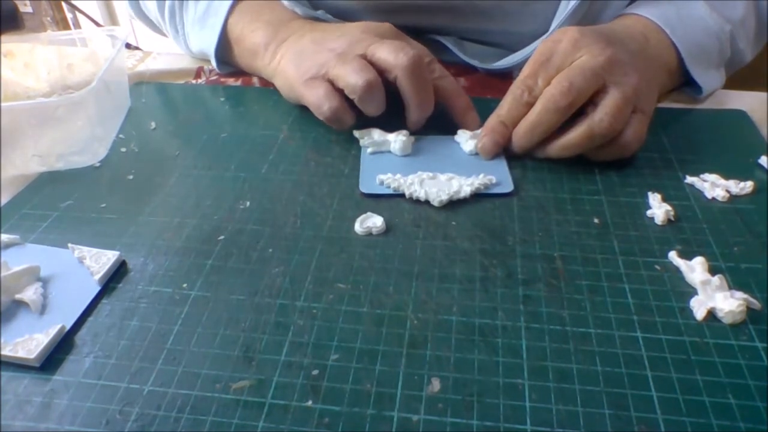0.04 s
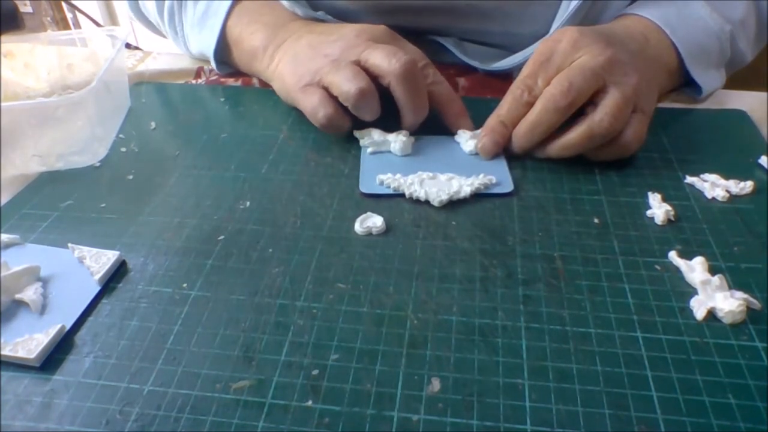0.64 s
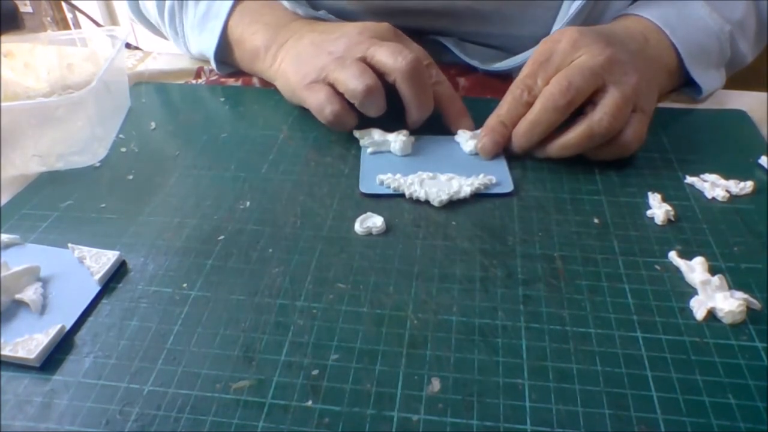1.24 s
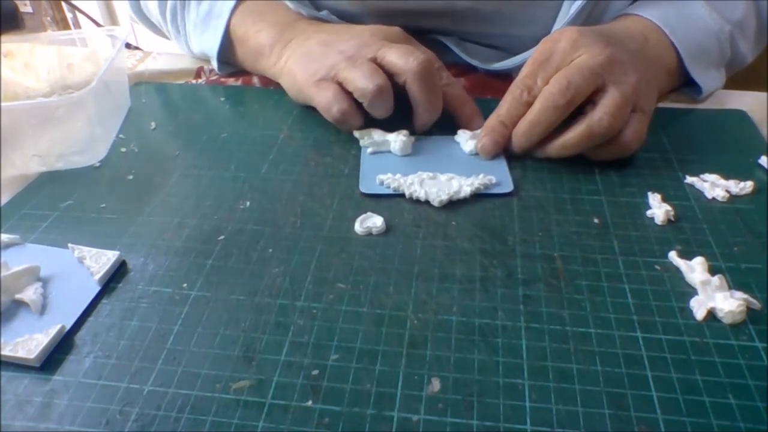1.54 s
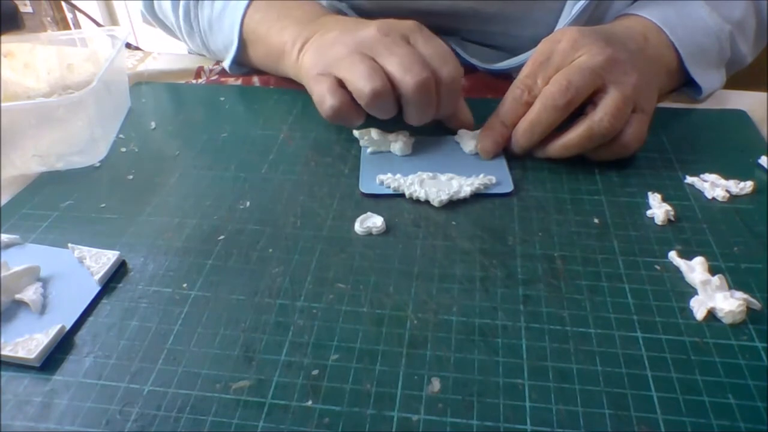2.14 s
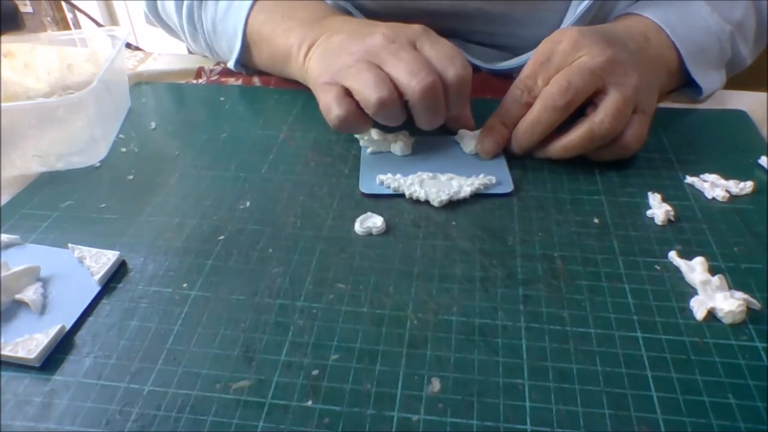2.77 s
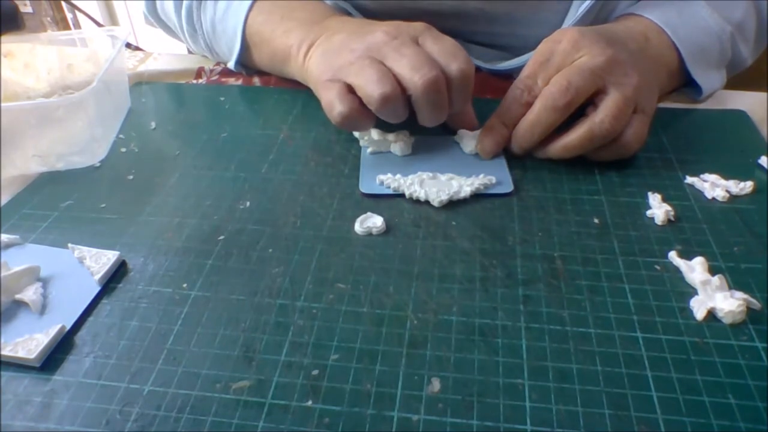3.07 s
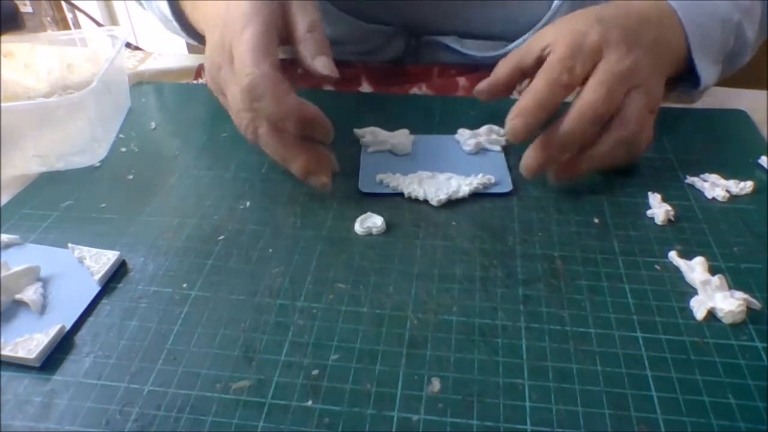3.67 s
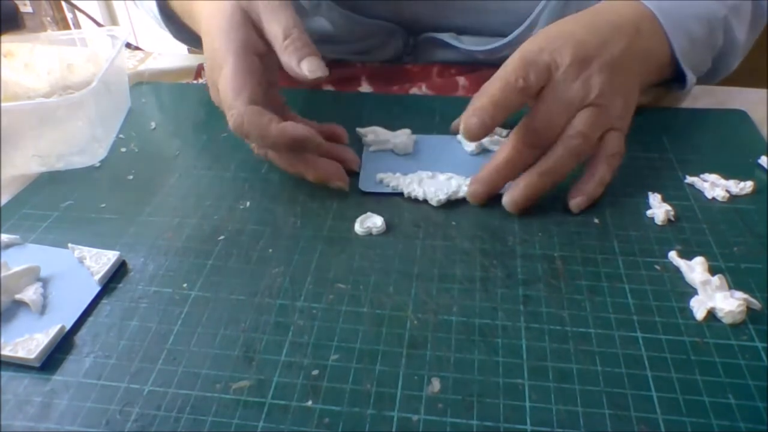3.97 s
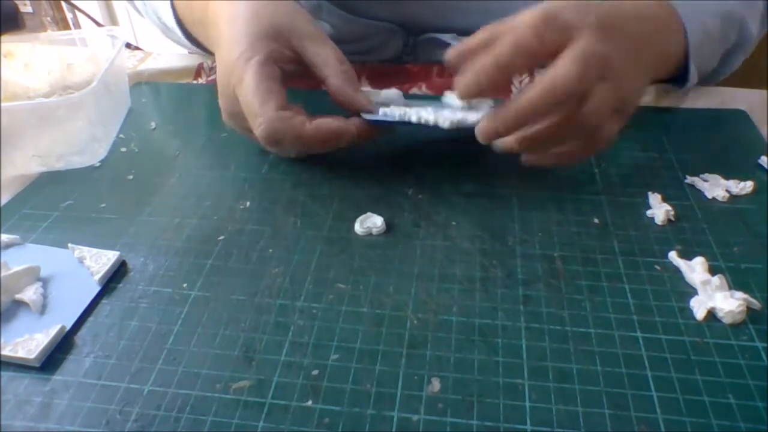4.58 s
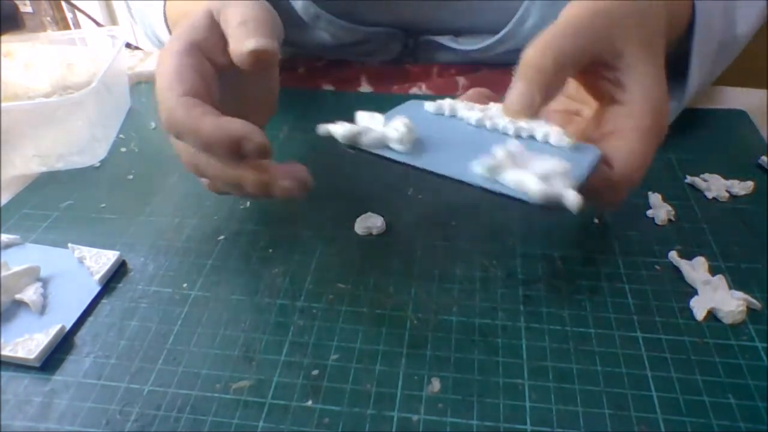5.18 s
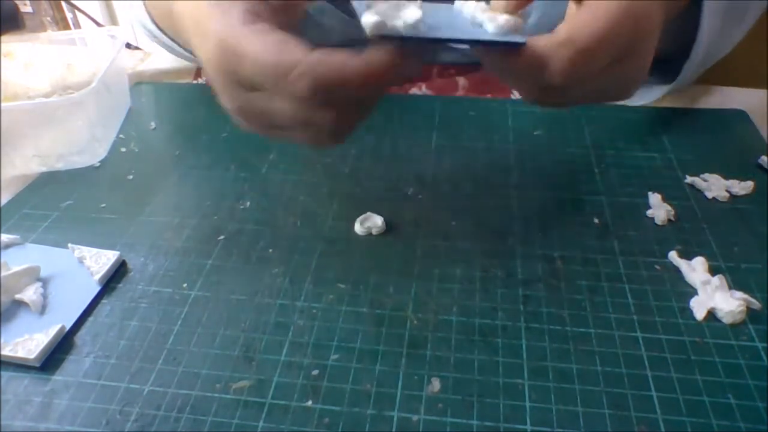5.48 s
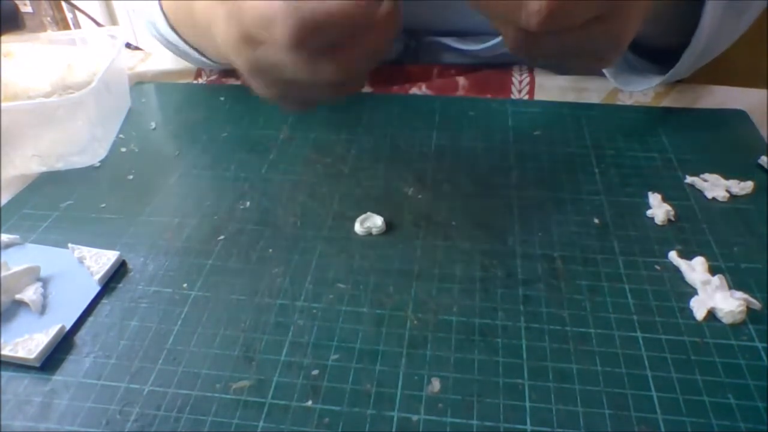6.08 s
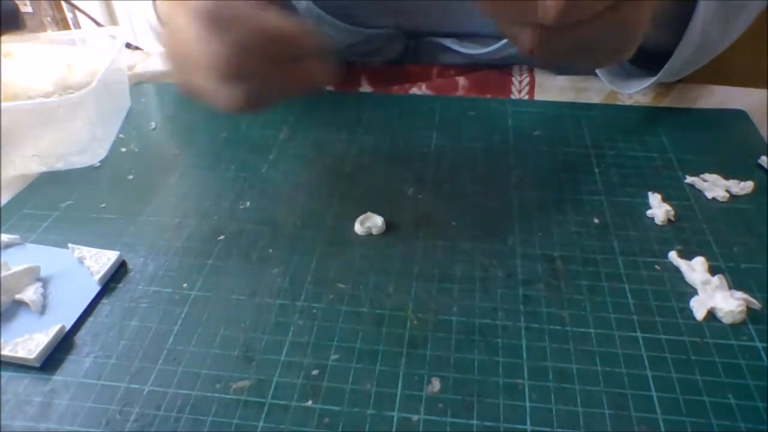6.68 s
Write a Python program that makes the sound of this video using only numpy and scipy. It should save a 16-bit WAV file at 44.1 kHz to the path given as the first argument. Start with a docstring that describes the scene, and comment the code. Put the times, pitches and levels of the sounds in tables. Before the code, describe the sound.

Fingers press small ornaments onto a card with four sharp taps, then the card is prised off a mat with a crackle and later flicked.

```python
"""A small, well damped room, close to a cutting mat on a table. Fingers press small cast ornaments
onto a card: four taps ring the ornaments and thump the table beneath. The card is prised up, its edge
slipping under the nails and knocking on the mat; later a finger flicks across it in the hand.
Skin and sleeves rustle faintly over air, a small fan and a low hum that dies away. Taps are impulses
and rubs are friction grain, both played through resonances and heard on a narrow-band microphone."""
import sys
import numpy as np
from scipy import signal
from scipy.fft import rfft, irfft, next_fast_len
from scipy.io import wavfile
from scipy.ndimage import uniform_filter1d

SR = 44100
rng = np.random.default_rng(int(sys.argv[2]) if len(sys.argv) > 2 else 0)


def wav_record(signal):
    """Record a signal, one row per channel, as 16-bit PCM in the file named by sys.argv[1]."""
    frames = np.transpose(np.atleast_2d(signal))
    bounded = np.clip(frames, -1, 1)
    # unit amplitude maps onto the largest positive 16-bit level
    quanta = np.round(bounded * 32767).astype(np.int16)
    wavfile.write(sys.argv[1], SR, quanta)


N = 300759
TIME = np.arange(N) / SR

# colour of the room air: f/Hz, relative level/dB
AIR_SPECTRUM = [(100, -14.5), (150, 2.5), (220, 4), (400, 1.5), (580, -6), (730, -5.5), (950, -6.5),
                (1250, -4.5), (1480, 1), (1750, -13.5), (2400, -12), (3300, -17), (6500, -18.5),
                (7500, -25.5)]
# tones of a small fan: f/Hz, level/dB
FAN_TONES = [(147, -82), (722, -83.5), (1467, -87.5), (1565, -88.5)]
# the low hum dying away: t/s, level/dB
HUM_FADE = [(0, -72), (.9, -71), (1.4, -73.5), (1.9, -82.5), (6.82, -94)]
# the hum's octave comes up for a while: middle t/s, length/s, level/dB
HUM_OCTAVE_SWELL = [(5.95, .8, -75)]
# the room's reverb time: f/Hz, T60/s
ROOM_DECAY = [(150, 0.11), (1000, 0.084), (3000, 0.05), (7000, 0.038)]

# finger presses, two merging into one tap: t/s, force/dB, contact cut-off/Hz, thump/dB, boom/dB,
# hard click/dB (these three relative to the force), grind level/dB, damping time/s, room send/dB
FINGER_PRESSES = [(0.2508, -23, 1500, 14, 21, -5.5, -72, 0.045, -26),
                  (0.5435, 15, 1630, 3, -17, -17.5, -36.5, 0.015, -33),
                  (0.9883, 8, 1794, -3.5, -9, -15, -52, .02, -28.5),
                  (0.9919, 8, 1520, 14.5, 19, 5, -30, .037, -24),
                  (1.366, 12, 1510, 1, -10, -30, -46.5, 0.013, -39)]
# ornament and card lying on the mat: f/Hz, width/Hz, level/dB
ORNAMENT_MODES = [(697, 55.2, -2.5), (902, 250, 0), (1152, 120, 6.5), (1295, 72, 1.5), (1415, 66, -1),
                  (1960, 62, -8.5), (2060, 73, -0.5), (2640, 73, 2), (2900, 110, -2), (4360, 140, -3),
                  (4500, 100, 0), (5650, 180, -2), (6000, 250, 1)]
# a hard edge clicking against the ornament: f/Hz, width/Hz, level/dB
HARD_EDGE_MODES = [(1100, 90, -0.5), (1540, 57, 5.5), (1920, 160, 4.5), (2080, 160, 1), (2546, 34, -4.5),
                   (3021, 120, -5), (3105, 61, 1.5), (4150, 400, 0), (4383, 130, -3.5), (5562, 590, -3),
                   (6410, 260, -4)]
# table top under the mat: f/Hz, width/Hz, level/dB
TABLE_MODES = [(195, 9.4, 6), (222.5, 40, 10.5), (262, 22.74, -5), (339.9, 50, -1), (403, 44, 2),
               (430, 15, -1)]
# the table's low boom under a press: f/Hz, width/Hz, level/dB
BOOM_MODE = [(198, 24, 3)]

# skin and sleeves rub as the hands move: middle t/s, length/s, level/dB
SKIN_RUBS = [(2.13, 0.15, -74), (3.17, 0.073, -77), (4.25, 0.038, -67.5), (4.37, 0.068, -70.5),
             (4.56, .07, -73), (4.815, 0.028, -65.5), (4.888, 0.021, -66.5), (5.06, 0.17, -77),
             (5.32, 0.11, -75.5), (5.82, 0.029, -67.5), (6.28, 0.15, -75.5), (6.55, .04, -68.5)]
# dry skin and cloth: f/Hz, width/Hz, level/dB
SKIN_MODES = [(998, 600, -2), (2390, 240, -1), (3111, 1100, 0.5), (4862, 1300, -2), (6040, 1200, -3.5)]
# tacky little ticks: t/s, force/dB, pitch f/Hz
TACKY_TICKS = [(2.0211, -23, 2750), (2.3826, -20, 2100), (2.3863, -21, 2150), (2.7023, -22.5, 2160),
               (2.7872, -20.5, 2030), (3.0524, -25.5, 2100), (3.1244, -27.5, 2207), (4.287, -27, 2100),
               (4.697, -33, 2950), (4.9402, -21.5, 2960), (5.191, -31, 3500), (5.38, -28.5, 1950)]
# ring of a tick: multiple of its pitch, width/Hz, level/dB
TACKY_MODES = [(1, 147, 1.5), (1.5, 340, -10)]
# light touches of nail on card: t/s, force/dB
NAIL_TOUCHES = [(2.151, -25.5), (3.165, -32), (3.3857, -30), (3.848, -32), (3.909, -25), (4.2078, -31.5),
                (4.221, -25), (4.23, -23.5), (4.5061, -25.5), (5.5398, -25), (5.826, -28), (6.405, -34),
                (6.5581, -25)]
# ring of nail on card: f/Hz, width/Hz, level/dB
NAIL_MODES = [(1060, 120, 1.5), (2120, 150, 1), (3220, 110, 2), (4563, 3600, -8), (6170, 1000, -11.5)]
# fingertips slide on the mat: middle t/s, length/s, level/dB
MAT_SLIDES = [(3.18, 0.04, -67), (3.76, 0.4, -72.5), (3.762, 0.032, -61), (4.14, 0.031, -67),
              (4.228, 0.021, -60.5), (4.51, 0.041, -72), (5.78, 0.075, -71.5)]
# cutting mat on the table: f/Hz, width/Hz, level/dB
MAT_MODES = [(249, 56, -1.5), (336.3, 39, -1), (460, 60, 1), (598.6, 93, -9.5), (756, 87, 0),
             (926, 66, 5.5), (1035, 100, -4.5), (1443, 95, -0.5), (2107, 500, -7), (4430, 2300, -25.5)]

# pulls that drag the card's edge over the mat: start t/s, hold/s, level/dB
EDGE_PULLS = [(3.938, 0.071, -34.5), (4.074, .043, -45)]
# the edge slips and catches: t/s, force/dB, contact cut-off/Hz
EDGE_SLIPS = [(3.9312, 13, 3900), (3.9343, 16, 3700), (3.9457, 2, 7000), (3.9515, 3, 4500),
              (3.9570, 14, 5500), (3.966, 10.5, 12000), (3.977, 15.5, 7040), (3.9844, 10, 5870),
              (3.9875, 8, 5910), (3.998, 13.5, 5850), (4, 15.5, 8940), (4.0058, 10.5, 8000),
              (4.0096, 8.5, 3030), (4.0274, -1.5, 3500), (4.0645, 11, 12000), (4.0871, 12, 2780),
              (4.0894, 16.5, 3800), (4.0957, 14, 3700), (4.1005, 9, 2000), (4.1154, 6.5, 1500)]
# the card knocks back on the mat: t/s, force/dB, contact cut-off/Hz
CARD_KNOCKS = [(3.9305, -6, 1200), (3.988, -4, 700), (4.0003, 2, 3500), (4.0205, 9, 280),
               (4.0876, 11, 2600), (4.0945, 14.5, 2600), (4.099, 6.5, 1000), (4.112, 0, 2000)]
# card held by its edges: f/Hz, width/Hz, level/dB
HELD_CARD_MODES = [(731.4, 38, -15), (900, 65, -7), (1047, 26, -10), (1336, 130, -2), (1412, 59, 2),
                   (1567.5, 105, 2), (1973, 110, -6), (2094, 150, -2), (2327, 200, -7.5),
                   (2630, 400, -14.5), (3230, 565, -7), (4675, 550, -10.5), (5685, 210, -13),
                   (6400, 230, -19)]
# a finger brushes the lifted card twice, then flicks over it: start t/s, hold/s, level/dB
FLICK_STROKES = [(5.553, 0.0028, -59), (5.58, .012, -59), (5.598, .026, -24)]
# lifted card, ringing more freely: f/Hz, width/Hz, level/dB
FREE_CARD_MODES = [(939, 26, -5.5), (1022, 43, 2), (1077, 35, -3), (1497, 11, 6), (1548, 24, 3.5),
                   (1658, 19, 1.5), (1760, 50, -9), (1977, 41, 6.5), (2072, 38, 1.5), (2181, 90, 2.5),
                   (2280, 67, -5), (2670, 43, 4.5), (3210, 76, -13.5), (3606, 172, -5.5),
                   (4865, 340, -14.5), (5434, 520, -11), (6420, 150, -18.5)]


def from_db(db):
    """Decibels to gain."""
    return 10 ** (np.asarray(db) / 20)


def unit_power(x):
    """Scale to an RMS of one."""
    return x / np.sqrt(np.mean(x ** 2) + 1e-20)


def at_hz(points, hz):
    """Read a table on a log-frequency axis."""
    freqs, values = np.transpose(points)
    return np.interp(np.log(hz + 1e-9), np.log(freqs), values)


def cut(x, hz, kind, order=2):
    """Butterworth filter."""
    return signal.sosfilt(signal.butter(order, hz, kind, fs=SR, output="sos"), x)


def add(out, s, sound):
    """Mix a sound in at time s."""
    at = int(round(s * SR))
    out[at:at + len(sound)] += sound[:N - at]


def click(db):
    """One impulse, followed by time to ring."""
    return from_db(db) * signal.unit_impulse(SR // 4) + 1e-18


def body(force, modes, pitch=1, travel_s=0):
    """Parallel resonances; low bending waves are slower and arrive later (travel_s at 1 kHz)."""
    out = np.zeros(len(force))
    for hz, width_hz, db in modes:
        r, w = np.exp(-np.pi * width_hz / SR), 2 * np.pi * hz * pitch / SR
        ring = signal.lfilter([(1 - r * r) / 2, 0, (r * r - 1) / 2], [1, -2 * r * np.cos(w), r * r], force)
        lag = int(travel_s * SR * np.sqrt(1000 / hz))
        out[lag:] += from_db(db) * ring[:len(force) - lag]
    return out


def rubbing(modes, grains_per_s, spread_db, low_hz, even_s=0.012):
    """Friction: tiny uneven catches at random moments ring a body, levelled to unit power."""
    sizes = from_db(spread_db * np.minimum(rng.exponential(1, N), 4)) * rng.choice([-1, 1], N)
    catches = sizes * (rng.random(N) < grains_per_s / SR) + 1e-18
    rasp = cut(body(catches, modes, travel_s=.0006), low_hz, "high", order=4)
    return rasp / np.sqrt(uniform_filter1d(rasp ** 2, int(even_s * SR)) + 1e-12)


def stroke(start_s, hold_s, db, attack_s, release_s):
    """Envelope that rises 60 dB over the attack up to start_s, holds, and falls 60 dB per release."""
    away = np.maximum((start_s - TIME) / attack_s, (TIME - start_s - hold_s) / release_s)
    return from_db(db - 60 * np.clip(away, 0, 4))


def swells(rows):
    """Gentle envelope: one bell curve for each row."""
    return sum(from_db(db) * np.exp(-2 * np.minimum(((TIME - s) / length_s) ** 2, 20))
               for s, length_s, db in rows)


def room_air(db=-70):
    """A steady bed of dark noise."""
    size = next_fast_len(N)
    white = rfft(rng.standard_normal(size))
    colour = from_db(at_hz(AIR_SPECTRUM, np.arange(len(white)) * SR / size))
    air = irfft(white * colour, size)[:N]
    return from_db(db) * unit_power(cut(air, 125, "high", order=8))


def fan(waver_hz=3.7):
    """A small fan's faint tones, each wavering in level and phase."""
    out = np.zeros(N)
    for hz, db in FAN_TONES:
        drift = cut(rng.standard_normal((2, N + SR)), waver_hz, "low")[:, SR:]
        phase = 2 * np.pi * hz * TIME
        out += from_db(db) * unit_power(drift[0] * np.cos(phase) + drift[1] * np.sin(phase))
    return out


def low_hum(hz=146):
    """A low tone dies away; its octave swells near the end."""
    phase = 2 * np.pi * hz * TIME
    fade = from_db(np.interp(TIME, *np.transpose(HUM_FADE)))
    return fade * np.sin(phase) + swells(HUM_OCTAVE_SWELL) * np.sin(2 * phase)


def room_response(first_echo_s=0.01, build_s=0.0071):
    """Diffuse echoes build up after the direct sound and die sooner in the treble."""
    t, edges_hz, tail = TIME[:SR // 3], np.geomspace(100, 9000, 9), 0
    for low, high in zip(edges_hz, edges_hz[1:]):
        decay = 1e-3 ** (t / at_hz(ROOM_DECAY, np.sqrt(low * high)))
        tail = tail + cut(rng.standard_normal(len(t)), [low, high], "band") * decay
    tail *= np.clip((t - first_echo_s) / build_s, 0, 1)
    return tail / np.sqrt(np.sum(tail ** 2) * SR / 2 / edges_hz[-1])   # about unity gain in its band


def presses(room):
    """A padded push rings the ornament and thumps the table; a hard edge clicks and grinds as it seats."""
    out = np.zeros(N)
    grind = rubbing(HARD_EDGE_MODES, grains_per_s=4900, spread_db=1.5, low_hz=398.4)
    for s, force_db, soft_hz, thump_db, boom_db, hard_db, grind_db, damping_s, room_db in FINGER_PRESSES:
        push = body(cut(click(force_db), soft_hz, "low"), ORNAMENT_MODES, travel_s=.0011)
        push = cut(push, 530, "high")   # the small ornament radiates little bass
        snap = body(click(force_db + hard_db), HARD_EDGE_MODES, travel_s=.0008)
        thump = body(click(force_db + thump_db), TABLE_MODES, travel_s=.00033)
        boom = body(click(force_db + boom_db), BOOM_MODE, travel_s=.00067)
        tap = push + snap + cut(thump + boom, [130, 900], "band")
        tap *= np.exp(-(TIME[:len(tap)] / damping_s) ** 2)   # the finger stays down and chokes the ring
        add(out, s, tap)
        add(out, s, from_db(room_db) * signal.fftconvolve(tap, room))
        out += grind * stroke(s, 0, grind_db, attack_s=.012, release_s=3.3 * damping_s)
    return out


def skin_rustle(resting_db=-86):
    """Skin and sleeves rub in soft swells; the hands are never quite still."""
    grain = rubbing(SKIN_MODES, grains_per_s=980, spread_db=2.0, low_hz=496, even_s=0.034)
    return (swells(SKIN_RUBS) + from_db(resting_db)) * grain


def ticks_and_touches():
    """Tacky ticks, each at its own pitch, and light taps of nail on card."""
    out = np.zeros(N)
    for s, force_db, pitch_hz in TACKY_TICKS:
        add(out, s, cut(body(click(force_db), TACKY_MODES, pitch_hz), [1500, 4200], "band"))
    for s, force_db in NAIL_TOUCHES:
        add(out, s, body(click(force_db), NAIL_MODES, travel_s=.0011))
    return out


def fingertip_slides():
    """Sliding fingertips draw a dull rasp from the mat."""
    return swells(MAT_SLIDES) * rubbing(MAT_MODES, grains_per_s=2500, spread_db=2.5, low_hz=160)


def prising(rebound_s=0.001386, rebound_db=-7, crack_db=-16, into_mat_db=-18.5):
    """The card's edge drags, slips and rebounds, knocking on the mat as it comes free."""
    drag = sum(stroke(s, hold_s, db, attack_s=.06, release_s=.095) for s, hold_s, db in EDGE_PULLS)
    out = drag * rubbing(HELD_CARD_MODES, grains_per_s=1900, spread_db=1.5, low_hz=221)
    mat_force = np.full(N, 1e-18)
    for s, force_db, contact_hz in EDGE_SLIPS:
        force = cut(click(force_db), contact_hz, "low")
        crack = from_db(crack_db) * cut(force, 2801, "high")   # the contact itself cracks first
        tick = body(force, HELD_CARD_MODES, travel_s=.0004)
        tick = cut(tick, 700, "high")   # so small a card radiates little bass
        add(out, s, crack + tick)
        add(out, s + rebound_s, from_db(rebound_db) * tick)
        add(mat_force, s, click(force_db + into_mat_db))
    for s, force_db, contact_hz in CARD_KNOCKS:
        add(mat_force, s, cut(click(force_db), contact_hz, "low"))
    return out + cut(body(mat_force, MAT_MODES, travel_s=.00072), 260, "high")


def flick(attack_s=.011, after_ring_db=-25):
    """A quick run of catches rings the card in the hand, leaving a faint tail."""
    envelope = np.zeros(N)
    for s, hold_s, db in FLICK_STROKES:
        envelope += stroke(s, hold_s, db, attack_s, release_s=.062)
        envelope += stroke(s, hold_s, db + after_ring_db, attack_s, release_s=.19)
    grain = rubbing(FREE_CARD_MODES, grains_per_s=4000, spread_db=3.0, low_hz=870, even_s=0.0088)
    return envelope * grain


def scene(card_send_db=-31, hands_send_db=-12.5):
    """Hands and card up close, with a short reverb, over the room tone."""
    room = room_response()
    card = prising() + flick()
    hands = skin_rustle() + ticks_and_touches() + fingertip_slides()
    send = from_db(card_send_db) * card + from_db(hands_send_db) * hands
    echoes = signal.fftconvolve(send, room)[:N]
    return (presses(room) + hands + card + echoes + room_air() + fan() + low_hum())[None]


def record(dry, low_hz=138, stopband_hz=7750):
    """The microphone drops the bass and the treble; the amplifier rounds the peaks a little unevenly."""
    thin = cut(dry, low_hz, "high", order=6)
    narrow = signal.sosfilt(signal.cheby2(14, 42, stopband_hz, fs=SR, output="sos"), thin)
    rounded = np.tanh(narrow + .04 * narrow ** 2)
    return cut(rounded, 15600, "low", order=12)


dry = scene()
out = record(dry)
wav_record(out)
```